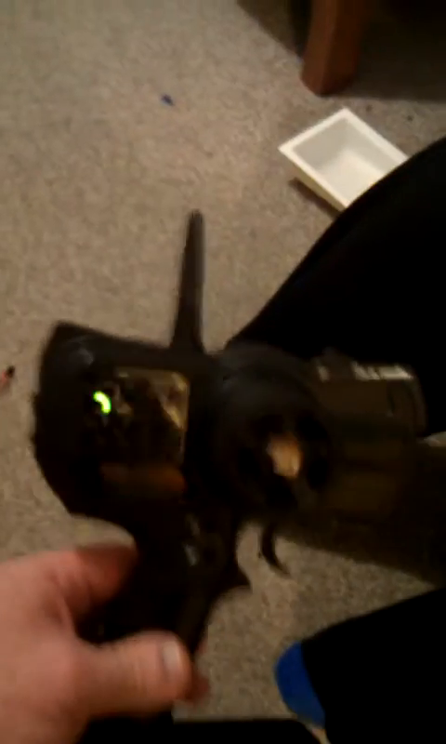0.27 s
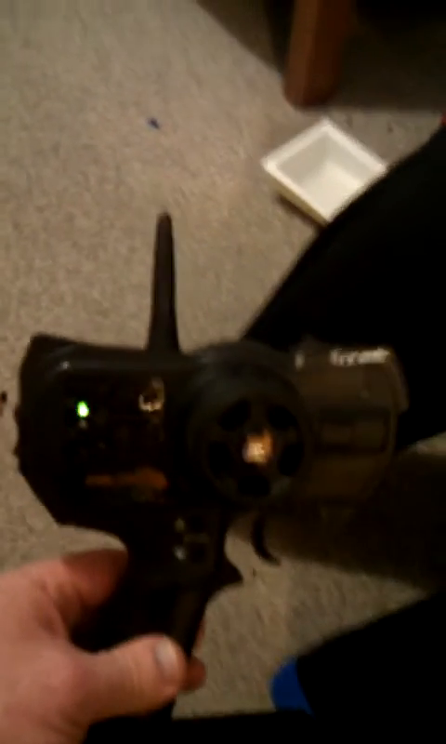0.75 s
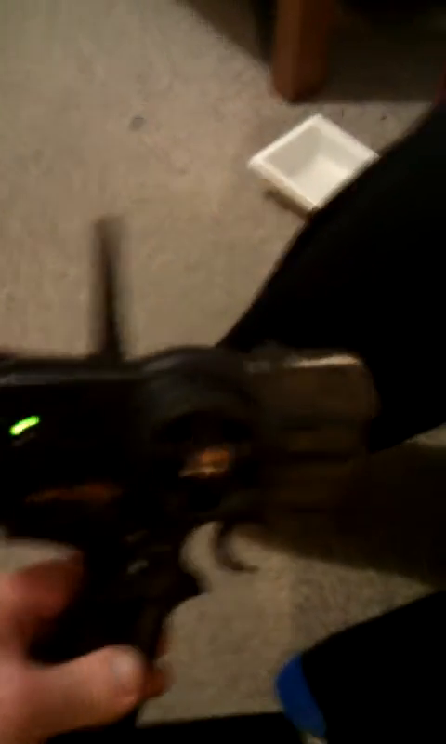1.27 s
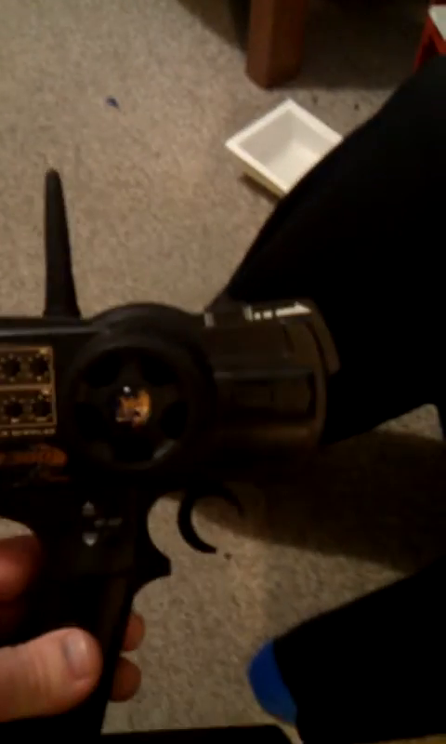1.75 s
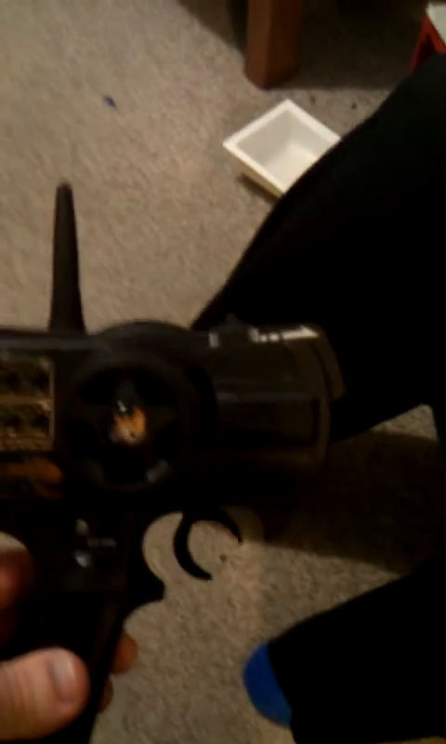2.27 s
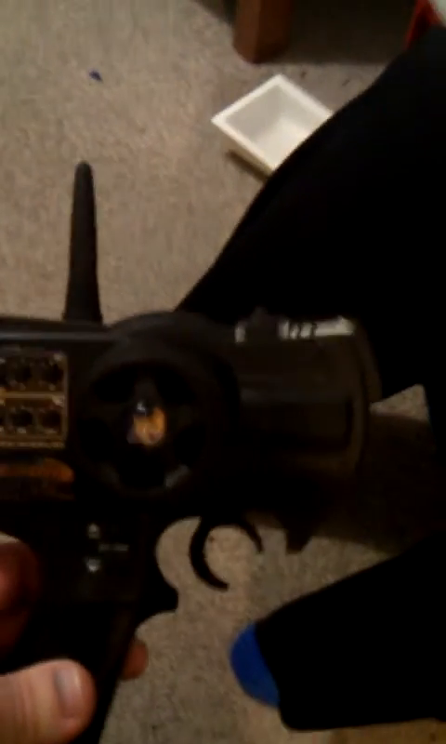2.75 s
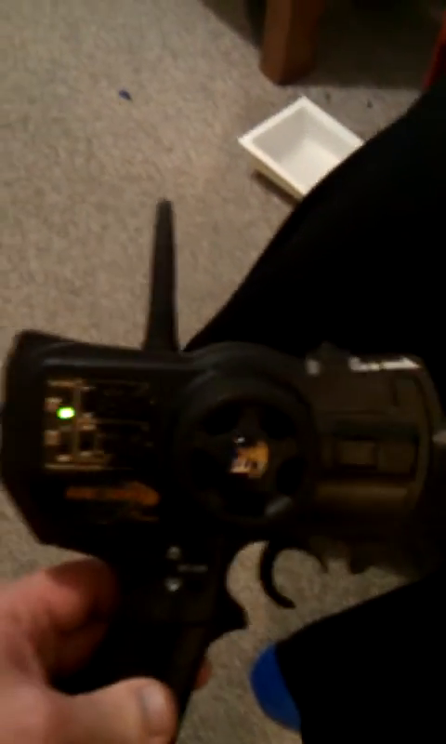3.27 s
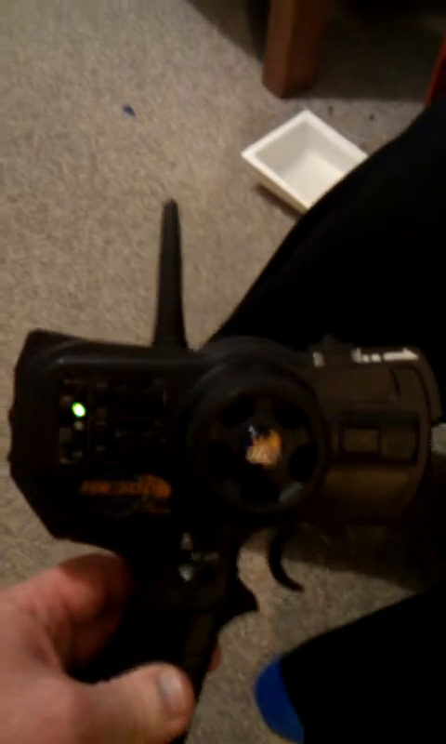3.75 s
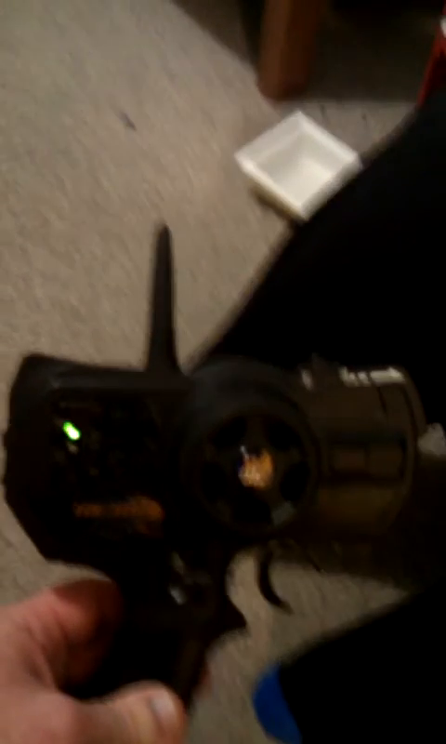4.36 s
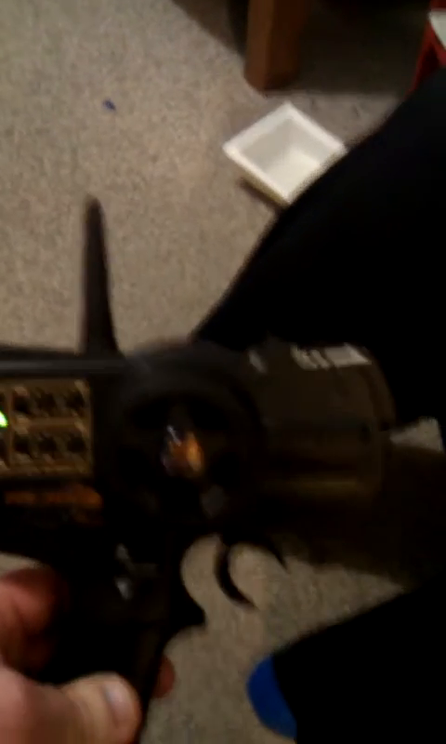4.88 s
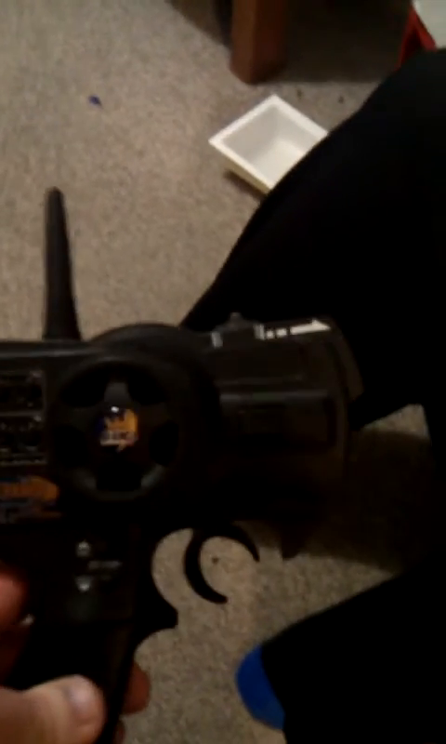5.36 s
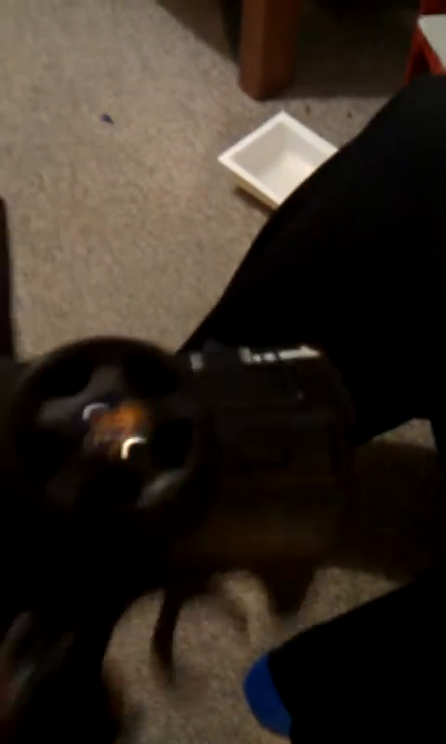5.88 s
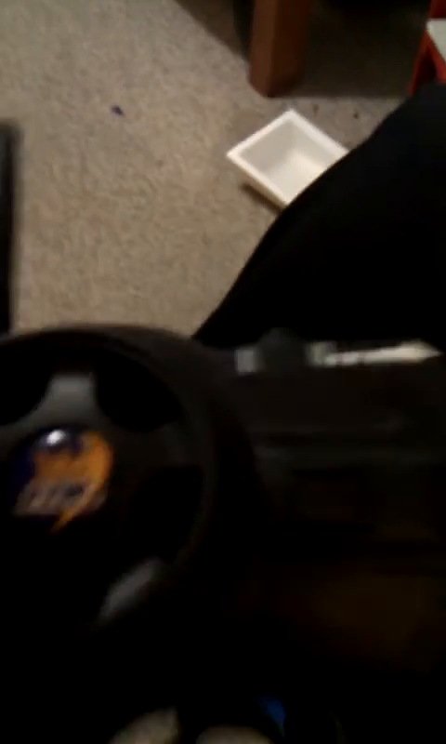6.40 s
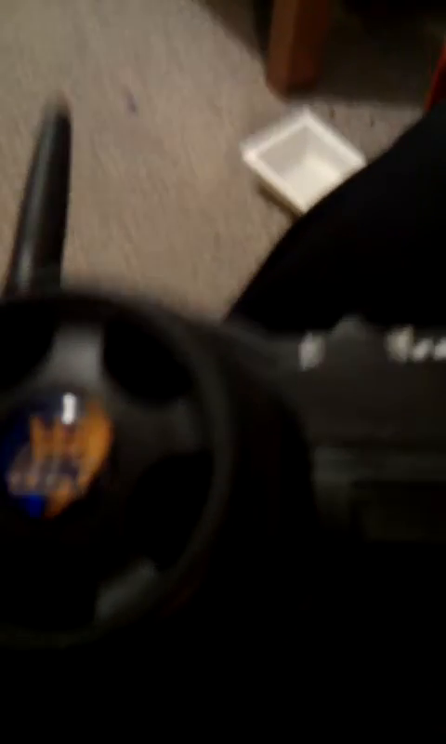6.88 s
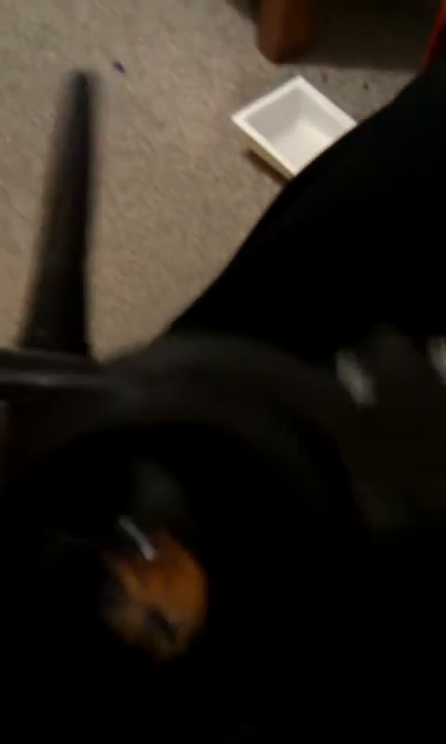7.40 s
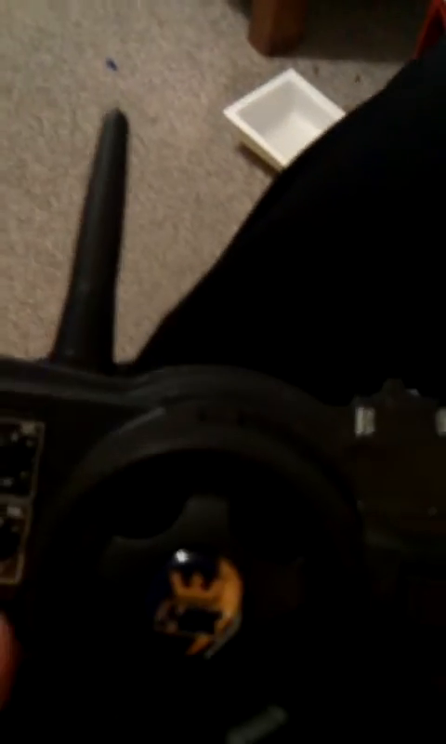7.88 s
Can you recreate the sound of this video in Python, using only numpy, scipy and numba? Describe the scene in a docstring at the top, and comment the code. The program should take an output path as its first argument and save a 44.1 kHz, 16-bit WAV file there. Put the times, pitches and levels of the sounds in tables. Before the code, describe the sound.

After two faint taps in a quiet room, two small electric ducted fans try to start five times. Each try brings rapid buzzing ticks under a thin high whine, with short rasping kicks, growls and sharp clacks. The first, third and fourth tries end in loud, hollow shaking of the plastic ducts; brief near-silences separate the tries. Close handheld microphone, small carpeted room, short reverberation.

```python
"""Two faint taps on the case over quiet room tone, then two brushless ducted fans fail to start, five tries in a row.
Torque pulses tick the stators under a thin switching whine; the rotors lurch and stall in short rasping kicks.
Noisy jolts through resonances make the ticks, rasps and duct rattle; gliding harmonics make growls and blade tones.
Three times the rotors shake hard in their plastic ducts, and once they nearly run up.
It all happens in a small carpeted room, with one microphone held in the hand."""
import sys
import numpy as np
from scipy import signal
from scipy.fft import rfft, irfft
from scipy.io import wavfile
from scipy.ndimage import uniform_filter1d
from numba import njit

SR = 44100
rng = np.random.default_rng(int(sys.argv[2]) if len(sys.argv) > 2 else 0)


def int16_out(signal):
    """Quantize to a 16-bit WAV file."""
    q = np.round(np.clip(np.atleast_2d(signal).T, -1, 1) * 32767)
    wavfile.write(sys.argv[1], SR, q.astype(np.int16))


N = 358974  # length in samples
T = np.arange(N) / SR  # time in seconds


def undb(db):
    """Decibels to gain."""
    return 10 ** (np.asarray(db) / 20)


def unit(x):
    """Scale to rms 1."""
    return x / np.sqrt(np.mean(x ** 2) + 1e-18)


def add(out, start, x):
    """Mix x in at a time in seconds."""
    i = max(0, int(start * SR))
    out[i:i + len(x)] += x[:max(0, N - i)]


def gate(start, end, fade):
    """1 between two times, with straight ramps inside them."""
    return np.clip(np.minimum(T - start, end - T) / fade, 0, 1)


def colour(x, points):
    """Causal minimum-phase filter through (Hz, dB) points."""
    hz, db = np.transpose(points)
    grid = np.fft.rfftfreq(4096, 1 / SR)
    cepstrum = irfft(np.log(undb(np.interp(np.log(grid + 1), np.log(hz), db))))
    half = len(cepstrum) // 2
    # folding the cepstrum forward in time makes the filter causal
    cepstrum[1:half] *= 2
    cepstrum[half + 1:] = 0
    response = irfft(np.exp(rfft(cepstrum)))
    return signal.oaconvolve(x, response)[:len(x)]


def ring(x, modes):
    """Sum of (Hz, width Hz, dB) resonances."""
    return sum(undb(db) * signal.lfilter(*signal.iirpeak(hz, hz / width, SR), x) for hz, width, db in modes)


def band(x, low_hz, high_hz, order=4):
    """Steep band-pass."""
    sos = signal.butter(order, [low_hz, high_hz], "band", fs=SR, output="sos")
    return signal.sosfilt(sos, x)


@njit
def sweep(x, hz, width):
    """State-variable band-pass whose centre moves."""
    out, band_state, low_state = np.empty(len(x)), 0., 0.
    for i in range(len(x)):
        g, k = np.tan(np.pi * hz[i] / SR), width / hz[i]
        v = (band_state + g * (x[i] - low_state)) / (1 + g * (g + k))
        band_state, low_state, out[i] = 2 * v - band_state, low_state + 2 * g * v, k * v
    return out


def walk(rate):
    """Random wander with a spread near 1, through `rate` chance points a second."""
    knots = rng.standard_normal(N // 10)
    return 1.203 * np.interp(T * rate, np.arange(len(knots)), knots)


def jolts(hz, jitter, scatter_db, grit, grit_s):
    """Mistimed torque steps of two motors; each jolt trails a short scrape. The power stays even."""
    turns = np.cumsum(hz * np.ones(N)) / SR
    steps = np.zeros(N)
    for motor in range(2):
        gap, size, side = rng.standard_normal((N // 40, 3)).T
        at = np.searchsorted(turns, np.cumsum(np.exp(jitter * gap)))
        step = np.sign(side) * undb(scatter_db * size)
        np.add.at(steps, at[at < N], step[at < N])
    scrape_power = signal.lfilter([1], [1, -np.exp(-2 / (grit_s * SR))], steps ** 2)
    scrape = np.sqrt(scrape_power) * rng.standard_normal(N)
    out = unit(steps) + grit * unit(scrape)
    return out / np.sqrt(np.abs(uniform_filter1d(out ** 2, size=1800)) + .01)


# Throttle openings, one list a try. Each row: time in seconds, relative level of the stator ticking in dB.
TRIES = [
    [(.294, -58), (.34, -58), (.37, -46), (.6, -38.5), (.8, -41.5), (1.43, -41)],
    [(1.655, -50), (1.69, -42), (1.96, -38.5), (2.12, -41), (2.29, -38.5), (2.56, -41.5)],
    [(2.849, -51), (2.9, -42), (3.15, -39), (3.35, -36.5), (3.49, -38), (3.6, -35.5), (3.9, -48.5),
     (3.95, -40), (4.42, -38), (4.56, -39), (4.75, -41), (5.483, -37.5)],
    [(5.842, -54.5), (5.866, -50), (5.885, -42.5), (6.11, -39.5), (6.42, -39.5), (6.72, -41),
     (7.483, -41.5)],
    [(7.703, -46.5), (7.745, -46), (7.765, -40.5), (7.9, -37.5), (8.2, -39)],
]
# Single pulses that open a try. Each row: start in seconds, relative level in dB as spread over 10 ms.
OPENING_PULSES = [(0.295, -51), (.309, -48), (.342, -48), (.354, -40.5), (1.657, -48), (2.857, -44),
                  (2.895, -41), (5.843, -49), (5.867, -44.5), (7.702, -50.5)]
# Stator resonances. Each row: centre in Hz, width in Hz, relative level in dB.
STATOR_MODES = [(650, 143, 3), (940, 190, -2), (1487, 45, -4), (1816, 120, -3.5), (2167, 140, -1),
                (2475, 62, 2.5), (3500, 230, -16), (4000, 130, -12), (4265, 200, -16), (5645, 590, -1),
                (5940, 190, -6.5)]
WHINE_HZ, WHINE_DB, WHINE_HISS_DB = 8014, -68, -4.5  # switching tone; hiss against the tone


def stators():
    """Start-up pulses tick the stalled stators; the controllers' switching whines while the throttle is open."""
    throttle = sum(gate(rows[0][0], rows[-1][0], .002) for rows in TRIES)
    current = undb(np.interp(T, *np.concatenate(TRIES).T) + walk(14))  # wavers by about 1 dB
    drive = jolts(hz=74.95, jitter=.35, scatter_db=2.5, grit=0.98, grit_s=0.0046) * throttle
    opening = np.zeros(N)
    for start, db in OPENING_PULSES:
        add(opening, start, undb([db]) * np.sqrt(.01 * SR))
    flicker = [undb(2.5 * walk(22)) for _ in STATOR_MODES]  # the rotor rests at ever new angles

    def body(x):
        modes = sum(gain * ring(x, [mode]) for gain, mode in zip(flicker, STATOR_MODES))
        return band(modes, 384, 4760, order=6)

    ticks = undb(-3.5) * body(drive * current + opening) / np.std(body(drive))
    phase = 2 * np.pi * np.cumsum(WHINE_HZ + 25 * walk(150)) / SR
    tone = np.sin(phase) * undb(6 * walk(50))
    hiss = band(drive, WHINE_HZ - 230, WHINE_HZ + 130)
    whine = unit(unit(tone) + undb(WHINE_HISS_DB) * unit(hiss))
    return ticks + undb(WHINE_DB) * throttle * whine


# Rotor kicks. Each row: start in seconds, length in seconds, relative level in dB.
KICKS = [(0.415, 0.053, -34.5), (0.493, 0.05, -31.5), (0.646, 0.063, -29.5), (0.742, 0.025, -33.5),
         (0.823, 0.058, -31), (0.93, 0.074, -33), (1.003, 0.064, -34.5), (1.089, 0.06, -39),
         (1.694, 0.026, -36), (1.776, 0.041, -33.5), (1.849, 0.068, -35), (1.995, 0.043, -30),
         (2.194, 0.043, -31.5), (2.337, 0.072, -31), (2.41, 0.063, -31.5), (2.47, 0.074, -33),
         (2.957, 0.035, -35), (3.025, 0.076, -33), (3.185, 0.052, -38.5), (3.295, 0.023, -35),
         (3.823, 0.041, -31), (3.915, 0.047, -37.5), (3.98, 0.078, -33), (4.101, 0.085, -32.5),
         (4.212, 0.061, -36.5), (4.316, .025, -40), (4.453, 0.046, -40), (4.722, .03, -39),
         (2.052, .022, -38.5), (3.438, .05, -47), (4.618, 0.056, -32.5), (4.79, 0.056, -31.5),
         (4.865, 0.052, -29.5), (5.939, 0.041, -36), (6.019, 0.044, -33.5), (6.145, 0.09, -34.5),
         (6.272, 0.087, -34), (6.354, 0.07, -36), (6.471, 0.072, -31), (6.581, 0.11, -33),
         (7.832, 0.023, -35), (7.927, 0.025, -36), (7.972, 0.024, -42), (8.063, 0.049, -38)]
# The one time the rotors nearly run up. Each row: time in seconds, blade rate of the faster fan in Hz,
# blade rate of the slower fan in Hz, relative level of the blade tones in dB.
RUN_UP = [(3.504, 561.2, 495, -50), (3.536, 690, 617, -31.5), (3.56, 794, 685, -37),
          (3.585, 922.6, 777, -29.5), (3.614, 1112, 926, -43), (3.652, 1289, 1048, -25.5),
          (3.684, 1140, 985, -38), (3.712, 999, 859, -39), (3.733, 880, 736.4, -29),
          (3.76, 739.6, 650, -39.5), (3.788, 613, 586.2, -29.5), (3.81, 547, 503, -43),
          (3.83, 471, 399, -45)]
STALL_HZ, SPIN_HZ_PER_S = 324.8, 3200  # a kick gains speed for half its length, then loses it
KICK_ATTACK_S, KICK_RELEASE_S = .011, 0.0092
RUN_UP_DB = -33.5  # relative level of the rasp while the fans run up


def lurches():
    """Force and commutation rate of the rotors: the longer a kick lasts, the faster they get."""
    force, hz = np.zeros(N), np.full(N, float(STALL_HZ))
    for start, length, db in KICKS:
        t = np.arange(int(max(length, .01) * SR)) / SR
        add(force, start, undb(db) * np.clip(np.minimum(t / KICK_ATTACK_S, t[::-1] / KICK_RELEASE_S), 0, 1))
        add(hz, start, SPIN_HZ_PER_S * np.minimum(t, t[::-1]))
    s, run_hz, _, _ = np.transpose(RUN_UP)
    running = gate(s[0], s[-1], KICK_ATTACK_S)
    return force + undb(RUN_UP_DB) * running, hz + running * (np.interp(T, s, run_hz) - hz)


# Spectrum of the kick rasp. Each row: frequency in Hz, gain in dB.
KICK_COLOUR = [(150, -39), (250, -18), (320, -5.5), (520, -1), (650, -1), (760, -0.5), (900, -4.5),
               (1200, -1), (1560, -0.5), (1690, 1.5), (1780, 3.5), (1880, -1.5), (1970, -4.5), (2150, -2),
               (2580, 4.5), (2780, 2), (3100, -38), (5000, -61)]
# Spectrum of the scraping treble, for kicks and shaking. Each row: frequency in Hz, gain in dB.
TREBLE_COLOUR = [(2000, -49.5), (3050, -5), (3500, 2.5), (3780, 4.5), (4250, 0.5), (4950, -7.5),
                 (5300, -7.5), (5550, 4), (5800, -4), (6020, -3), (6350, -10), (6750, -18), (7200, -54.5),
                 (8200, -87.5)]
KICK_TREBLE_DB = -13  # scraping against the rasp
RUN_UP_TREBLE_DB, RUN_UP_LOW_DB = -6.5, -4.5  # change of scraping and low rasp while spinning freely


def kicks():
    """The rotors catch, speed up and stall: their rasp's pulse rate rises and falls as two resonances slide."""
    force, hz = lurches()
    drive = jolts(hz=hz, jitter=.1, scatter_db=2.5, grit=0.47, grit_s=0.0041)
    slide = np.exp(.17 * walk(25))
    chatter = sum(unit(sweep(drive, centre_hz * slide, 59.0)) * undb(db)
                  for centre_hz, db in ((730, -4.5), (1900, -7.5)))
    rasp = unit(unit(colour(drive, KICK_COLOUR)) + band(chatter, 452, 2400))
    free = gate(RUN_UP[0][0], RUN_UP[-1][0], 0.084)  # spinning freely, the rotors scrape and knock less
    high_pass = signal.butter(3, 1300, "high", fs=SR, output="sos")
    upper = signal.sosfiltfilt(high_pass, rasp)
    rasp = upper + undb(RUN_UP_LOW_DB * free) * (rasp - upper)
    treble_gain = undb(KICK_TREBLE_DB + RUN_UP_TREBLE_DB * free)
    return force * (rasp + treble_gain * unit(colour(drive, TREBLE_COLOUR)))


# Bouts of hard shaking, one list a bout. Each row: time in seconds, duct level in dB and rasp level in dB
# (both before the trims below), loudest duct resonance in Hz before it strays.
SHAKING = [
    [(1.11, -43, -36, 755), (1.162, -19.5, -25, 710), (1.202, -25.5, -24, 712), (1.21, -20.5, -21.5, 714),
     (1.276, -18.5, -20.5, 703), (1.336, -17, -23, 778), (1.38, -28.5, -27.5, 810), (1.4, -25, -34, 800),
     (1.44, -50, -33, 750)],
    [(4.91, -29, -31, 694), (4.958, -26.5, -25.5, 919), (5.194, -20.5, -19, 950), (5.236, -18, -19, 775),
     (5.29, -16.5, -18, 972), (5.328, -16.5, -20, 739.3), (5.418, -21.5, -24.5, 694.2),
     (5.46, -35, -34.5, 759), (5.48, -37, -41, 763)],
    [(6.73, -39.5, -34.5, 724), (6.798, -22, -26.5, 980), (6.85, -25.5, -24, 930), (6.876, -26, -25.5, 897),
     (6.9, -23, -19.5, 800), (6.958, -16.5, -18.5, 820), (7.01, -20.5, -18.5, 968),
     (7.084, -20.5, -17.5, 777), (7.162, -25.5, -23, 940), (7.378, -16.5, -18.5, 914),
     (7.468, -28.5, -27, 963), (7.515, -30, -36.5, 718)],
]
# Duct resonances. Each row: centre in Hz, width in Hz, relative level in dB.
DUCT_MODES = [(675.8, 55, -6.5), (775, 33, 2), (932, 70, -0.5), (1002, 41, -4.5)]
# Blade resonances. Each row: centre in Hz, width in Hz, relative level in dB.
BLADE_MODES = [(1518, 78, 2.5), (1737.5, 93, 1), (1845, 18, 3), (2080, 9.4, -12), (2173, 110, -7),
               (2357, 200, -4), (2527, 60, 3.5), (2680, 22, -8)]
# Spectrum of the blade rasp, for shaking and slams. Each row: frequency in Hz, gain in dB.
RASP_COLOUR = [(280, -56), (450, -10), (620, -6.5), (1000, -0.5), (1200, -7), (1700, 0.5), (2550, 8.5),
               (2850, -2), (3100, -17.5), (5000, -72)]
DUCT_TRIM_DB, RASP_TRIM_DB, SHAKE_TREBLE_DB = -1.1, -0.43, -7.5  # the treble follows the rasp level
UPPER_BLADES_HZ, UPPER_BLADES_WIDTH_HZ = 2600, 480
UPPER_BLADES_EVEN_HZ = 880  # duct resonance at which the upper blade band is left as it is


def shaking():
    """With more current the rotors slam to and fro, ringing ducts and blades, now one resonance, now another."""
    s, duct_db, rasp_db, hz = np.concatenate(SHAKING).T
    bouts = sum(gate(bout[0][0], bout[-1][0], 0.0062) for bout in SHAKING)
    drive = jolts(hz=110.33, jitter=.45, scatter_db=1.0, grit=1.7, grit_s=0.0063)

    def restless(modes):
        return unit(sum(ring(drive, [mode]) * undb(3 * walk(35)) for mode in modes))

    loudest_hz = np.interp(T, s, hz)
    centre = loudest_hz * np.exp(0.035 * walk(30))  # strays as the speed jerks about
    boom = unit(sweep(sweep(drive, centre, 260.), centre, 260.))
    duct = unit(band(boom + 1.58 * restless(DUCT_MODES), 478, 1123))
    blades = unit(unit(colour(drive, RASP_COLOUR)) + 1.17 * unit(band(restless(BLADE_MODES), 1354, 2750)))
    # the upper blade resonances grow as the shaking gets faster
    lift = (loudest_hz / UPPER_BLADES_EVEN_HZ) ** 2 - 1
    blades = blades + lift * ring(blades, [(UPPER_BLADES_HZ, UPPER_BLADES_WIDTH_HZ, 0)])
    treble = unit(colour(drive, TREBLE_COLOUR))
    lumps = unit(undb(0.76 * walk(130)))
    rasp = (undb(RASP_TRIM_DB) * blades + undb(SHAKE_TREBLE_DB) * treble) * lumps
    duct_gain = undb(np.interp(T, s, duct_db) + DUCT_TRIM_DB)
    return bouts * (duct_gain * duct + undb(np.interp(T, s, rasp_db)) * rasp)


# Hardest slams within the shaking. Each row: start in seconds, ring in Hz, relative level of the boom in dB.
SLAMS = [(1.154, 715, -21), (1.186, 700, -19.5), (1.207, 800, -23.5), (1.233, 786, -16), (1.257, 658, -19),
         (1.297, 777, -13), (1.313, 652, -20), (1.33, 784, -23), (5.153, 990, -15.5), (5.221, 746, -15),
         (5.24, 903, -21.5), (5.295, 798, -12), (5.33, 713, -13.5), (5.343, 650, -18.5), (6.74, 728, -29.5),
         (6.78, 800, -22.5), (6.826, 967, -15), (6.857, 1003, -16.5), (6.893, 638, -18), (6.92, 662, -21),
         (6.998, 961, -14), (7.067, 615, -17.5), (7.112, 807, -17.5), (7.24, 775, -17), (7.272, 990, -15),
         (7.318, 900, -27.5), (7.385, 1012, -15.5)]
SLAM_RISE_S, SLAM_RASP_DB = 0.0059, -7  # time to the peak; rasp against the boom


def slams():
    """The hardest jerks of the shaking: the duct booms briefly, and the blades rasp with it."""
    out, t = np.zeros(N), T[:SR // 12]
    swell = t / SLAM_RISE_S * np.exp(1 - t / SLAM_RISE_S)
    for start, hz, db in SLAMS:
        rasp = unit(colour(rng.standard_normal(len(t)), RASP_COLOUR)) * swell ** 2
        boom = swell * np.sin(2 * np.pi * hz * t)
        add(out, start, undb(db) * (boom + undb(SLAM_RASP_DB) * rasp))
    return out


def run_up():
    """Both fans spin for a moment: two blade tones with their overtones climb and sink."""
    s, faster_hz, slower_hz, db = np.transpose(RUN_UP)
    tones = 0
    for hz, fan_db in ((faster_hz, 0), (slower_hz, -2)):
        phase = 2 * np.pi * np.cumsum(np.interp(T, s, hz) * (1 + 0.013 * walk(220))) / SR
        fan_gain = undb(fan_db + 1.3 * walk(70))
        # the overtones fall by 11.5 dB an octave
        tones = tones + fan_gain * sum(undb(-11.5 * np.log2(k)) * np.sin(k * phase) for k in range(1, 4))
    return gate(s[0], s[-1], KICK_ATTACK_S) * undb(np.interp(T, s, db)) * unit(tones)


# Low growls of a turning rotor. Each row: start in seconds, length in seconds, start pitch in Hz,
# end pitch in Hz (both before the shake), relative level in dB.
GROWLS = [(0.418, 0.088, 299.6, 387, -51.5), (0.494, 0.086, 366, 276, -55),
          (0.636, 0.15, 393, 297.6, -51.5), (0.823, 0.078, 373.7, 309.4, -53),
          (0.921, 0.081, 283.3, 392.6, -49.5), (0.994, 0.08, 383.4, 304, -49),
          (1.072, 0.047, 308, 380.5, -48), (1.986, 0.042, 356.3, 372, -45.5), (2.185, 0.06, 356, 312, -55),
          (2.369, 0.1, 299.2, 379.6, -47.5), (2.463, 0.087, 382, 292, -59), (2.948, 0.047, 318.2, 347, -55),
          (3.034, 0.058, 309, 378, -50), (3.819, 0.042, 376.6, 256.3, -53),
          (4.091, 0.082, 297.9, 441.6, -45), (4.196, .1, 304.7, 333.6, -48.5),
          (4.611, 0.061, 315.4, 374, -49.5), (6.009, 0.058, 322.5, 394.3, -49),
          (6.137, 0.085, 320.1, 479, -44.5), (6.365, 0.062, 285.1, 331.7, -52.5),
          (6.473, 0.072, 401.4, 315.3, -50), (6.59, 0.094, 431, 274.2, -47.5)]
GROWL_OCTAVE_DB, GROWL_BUZZ_DB = 3, 3  # second harmonic; each higher harmonic, before it wanders


def growls():
    """A rotor that catches for a few turns growls on a low gliding note, with a buzz of unsteady harmonics."""
    level, hz = np.zeros(N), np.full(N, float(STALL_HZ))
    for start, length, start_hz, end_hz, db in GROWLS:
        level += undb(db) * gate(start, start + length, 0.0037)
        turning = (T > start) & (T < start + length)
        hz[turning] = np.linspace(start_hz, end_hz, turning.sum())
    phase = 2 * np.pi * np.cumsum(hz * (1 + 0.0295 * walk(200))) / SR  # the note shakes
    buzz = sum(walk(45) * np.sin(k * phase) for k in range(3, 7))
    return level * (np.sin(phase) + undb(GROWL_OCTAVE_DB) * np.sin(2 * phase) + undb(GROWL_BUZZ_DB) * buzz)


def knocks(rows, spectrum, decay_s):
    """Short hard contacts: decaying noise bursts with a common colour and a peak level each."""
    out, t = np.zeros(N), T[:SR // 40]
    for start, db in rows:
        hit = colour(rng.standard_normal(len(t)) * np.exp(-t / decay_s), spectrum)
        add(out, start, undb(db) * hit / np.abs(hit).max())
    return out


# Sharp clacks of the loose rotor. Each row: start in seconds, peak level in dB before a common 2.5 dB lift.
CLACKS = [(2.0056, -34), (2.0102, -24.5), (2.0655, -24.5), (2.3435, -31), (2.4281, -29), (3.041, -27),
          (3.1951, -28.5), (3.2328, -29), (3.333, -26), (3.3475, -27), (3.357, -22.5), (3.3708, -28),
          (3.3744, -22), (3.3917, -32), (3.4753, -27), (3.8359, -29), (4.1148, -26), (4.3249, -29),
          (4.3463, -27), (4.3595, -33), (4.4235, -36), (4.4675, -26), (4.471, -35), (4.4775, -25),
          (4.4814, -24.5), (4.493, -33), (4.4968, -33), (4.5922, -35), (4.6281, -28.5), (6.398, -26.5),
          (6.6506, -43), (6.6636, -31), (7.9582, -27.5), (7.9727, -28), (7.9865, -32), (8.057, -33),
          (8.077, -25), (8.1005, -31), (8.1074, -26), (8.1127, -24), (8.128, -33)]
# Spectrum of a clack. Each row: frequency in Hz, gain in dB.
CLACK_COLOUR = [(500, -20.5), (1000, -4), (2600, -9), (3100, -14), (3700, 2), (4600, 1.5), (5200, -11),
                (6300, -29.5), (7200, -43.5), (9000, -57.5)]
FAINT_CLACK_RATE, FAINT_CLACK_DB, FAINT_SCATTER_DB = 5.6, -33, 0.5  # sets the gaps; level before the lift
FAINT_CLACK_DELAY_S = .3  # the rotor works loose a while into each try


def clacks():
    """The loose rotor strikes its duct: some sharp clacks, and faint ones at random well into each try."""
    chance = rng.standard_normal((100, 2))
    times = np.cumsum(np.exp(chance[:, 0] - .5)) / FAINT_CLACK_RATE
    faint = [(s, FAINT_CLACK_DB + FAINT_SCATTER_DB * size) for s, size in zip(times, chance[:, 1])
             if any(rows[0][0] + FAINT_CLACK_DELAY_S < s < rows[-1][0] for rows in TRIES)]
    return undb(2.5) * knocks(list(CLACKS) + faint, CLACK_COLOUR, decay_s=0.0014)


# Screeches of the windings. Each row: start in seconds, length in seconds, relative level in dB.
SCREECHES = [(4.933, 0.022, -37), (4.998, 0.09, -37), (5.116, 0.022, -32), (5.267, 0.017, -33),
             (6.862, 0.021, -29.5), (7.035, 0.027, -29), (7.154, 0.055, -33.5), (7.436, 0.016, -26)]


def screeches():
    """At full current the controller races ahead of a stuck rotor and the windings screech on odd harmonics."""
    level = sum(undb(db) * gate(start, start + length, 0.0034) for start, length, db in SCREECHES)
    phase = 2 * np.pi * np.cumsum(2008 * (1 + 0.008 * walk(300))) / SR
    partials = sum(undb(db) * np.sin(k * phase) for k, db in ((1, -7.5), (3, -1), (5, -27)))
    return level * undb(1.2 * walk(90)) * unit(partials)


# The rotor falls into step with one resonance, which sings out. Each row: start in seconds,
# length in seconds, pitch in Hz before it strays, relative level in dB.
SQUEALS = [(1.203, 0.02, 1870, -21), (1.255, 0.021, 1890, -24), (1.292, .018, 1560, -22),
           (1.318, 0.023, 1535, -19.5), (1.35, 0.031, 1835, -26), (2.36, 0.038, 640, -32),
           (2.49, 0.025, 1700, -35.5), (5.03, 0.023, 2600, -24), (5.15, 0.019, 1800, -23),
           (5.16, .018, 2570, -20), (5.19, 0.025, 2560, -19.5), (5.268, 0.024, 2550, -21.5),
           (5.388, 0.062, 690, -24), (6.975, 0.035, 2380, -22), (7.0, .03, 1870, -31),
           (7.07, 0.034, 580, -24), (7.075, 0.036, 1870, -39), (7.245, .035, 915, -22.5),
           (7.315, .03, 2570, -21.5), (7.465, .03, 1870, -26.5)]


def squeals():
    """One resonance of a blade or duct sings out briefly, a little unsteady in pitch."""
    out, stray = np.zeros(N), 1 + 0.012 * walk(160)
    for start, length, hz, db in SQUEALS:
        t = np.arange(int(max(length, .01) * SR)) / SR
        phase = 2 * np.pi * np.cumsum(hz * stray[int(start * SR):][:len(t)]) / SR
        swell = np.clip(np.minimum(t, t[::-1]) / 0.0078, 0, 1)
        add(out, start, undb(db) * swell * unit(np.sin(phase)))
    return out


# Soft bumps of the hand. Each row: start in seconds, length in seconds, relative level in dB at the start.
BUMPS = [(7.317, 0.14, -37), (7.536, 0.08, -46.5)]
# Faint handling taps. Each row: start in seconds, peak level in dB.
TAPS = [(.114, -46), (.156, -47)]


def handling():
    """The hand bumps and taps the plastic case near the microphone: low noise swells and short knocks."""
    press = 0
    for start, length, db in BUMPS:
        fall_db = -7 * np.clip((T - start) / length, 0, 1)  # a bump dies away as it lasts
        press = press + undb(db + fall_db) * gate(start, start + length, 0.018)
    bumps = press * unit(band(rng.standard_normal(N), 120, 410, order=3))
    tap_colour = [(300, -14), (1300, 4), (2000, -25), (3500, -16), (7000, -23)]  # (Hz, dB)
    return bumps + knocks(TAPS, tap_colour, decay_s=0.0032)


# Low drone swells. Each row: start in seconds, length in seconds, pitch in Hz before it wanders, level in dB.
DRONES = [(1.335, 0.38, 68.7, -66), (3.219, .4, 52.4, -64), (6.2, .3, 53.06, -62),
          (6.521, 0.23, 55.04, -64)]


def drone():
    """A faint low drone, a sine of wandering pitch, comes and goes."""
    out = 0
    for start, length, hz, db in DRONES:
        phase = 2 * np.pi * np.cumsum(hz * (1 + 0.037 * walk(22))) / SR
        out = out + undb(db) * gate(start, start + length, 0.075) * unit(np.sin(phase))
    return out


# Spectrum of the room tone. Each row: frequency in Hz, gain in dB.
ROOM_TONE = [(15, -16.5), (25, -11.5), (60, 2), (98, -6.5), (131, -1.5), (158, -12), (186, -7),
             (243, -12.5), (271, -3), (501, -11.5), (558, -11), (5720, -21.5), (7280, -24), (15000, -30.5)]


def room_tone():
    """Quiet coloured noise fills the background, its level barely wavering."""
    return undb(-61.5 + 0.29 * walk(9.6)) * unit(colour(rng.standard_normal(N), ROOM_TONE))


def room(x, t60_s, wet_db):
    """Close walls and furniture: dense reflections with a short tail and an even colour."""
    t = T[:SR * 2 // 3]
    decay = undb(-60 * t / t60_s) + 3.36 * np.exp(-t / 0.0037)
    tail = rng.standard_normal(len(t)) * (t > .003) * decay
    direct = t == 0
    spectrum = rfft(direct + undb(wet_db) * tail / np.linalg.norm(tail), 2 * len(t))
    even = spectrum / np.sqrt(uniform_filter1d(np.abs(spectrum) ** 2, size=100))
    return signal.oaconvolve(x, irfft(even)[:len(t)])[:N]


# Sharp resonances that ring on after the shaking. Each row: centre in Hz, width in Hz, relative level in dB.
RING_ON = [(652, 13, -16), (778, 12, -12.5), (1886, 7, -6.5)]


def scene():
    """Fans, room and hand, the same in both channels."""
    shake = shaking() + slams()
    fans = stators() + kicks() + growls() + shake + ring(shake, RING_ON)
    highs = room(clacks() + screeches(), t60_s=0.16, wet_db=-3)  # the carpet soaks up the treble sooner
    tones = room(run_up() + squeals(), t60_s=0.3, wet_db=-5.5)  # the ducts beam their tones at the microphone
    mono = room(fans, t60_s=0.28, wet_db=-2.5) + highs + tones + handling() + drone() + room_tone()
    return np.array([mono, mono])


def record(dry):
    """The recorder cuts the top above 15.7 kHz with a steep low-pass."""
    return signal.sosfilt(signal.ellip(8, .2, 70, 15700, fs=SR, output="sos"), dry)


dry = scene()
out = record(dry)
int16_out(out)
```